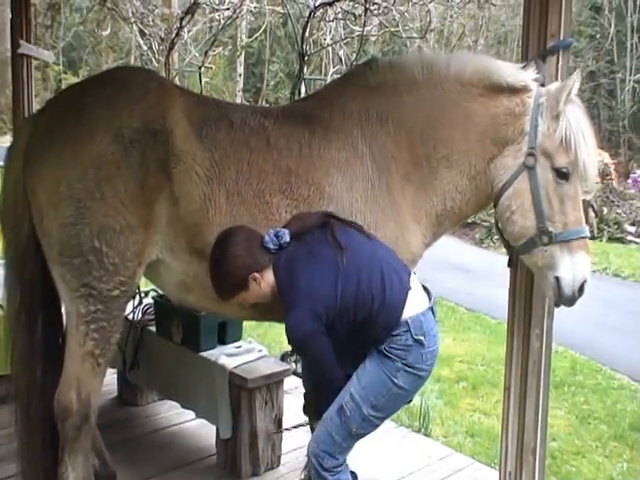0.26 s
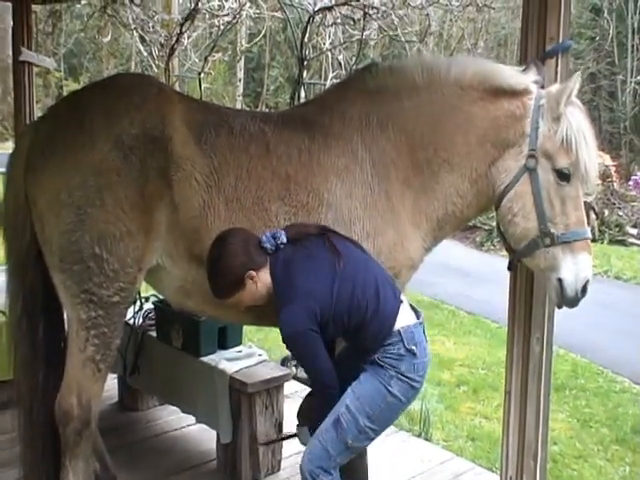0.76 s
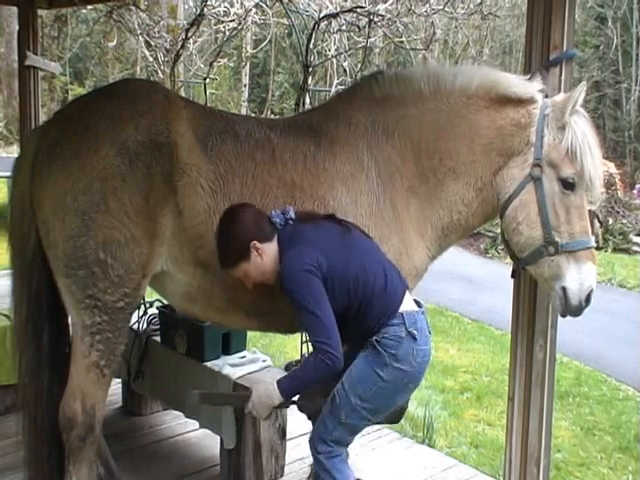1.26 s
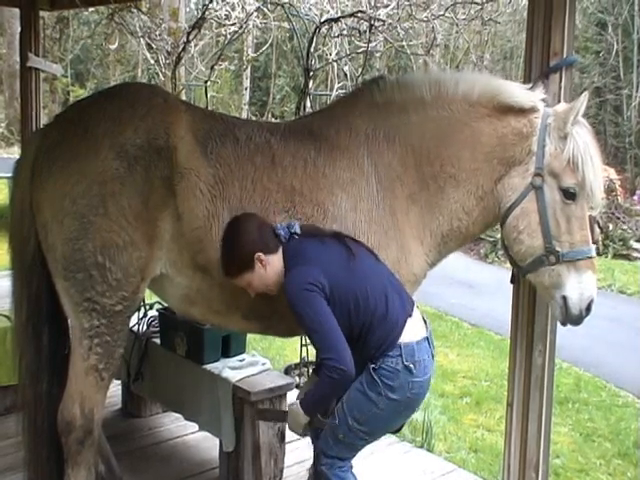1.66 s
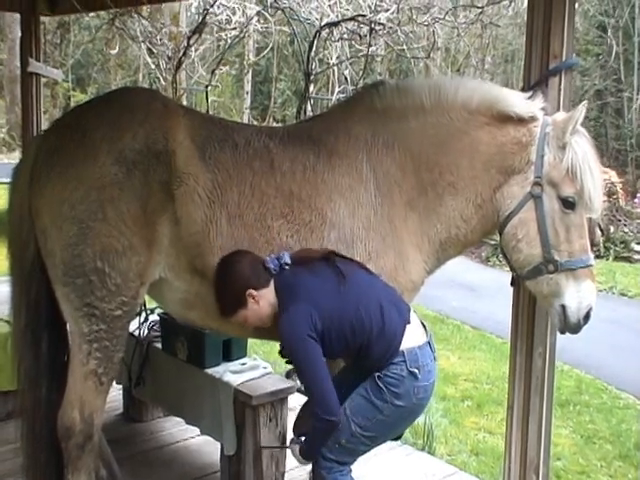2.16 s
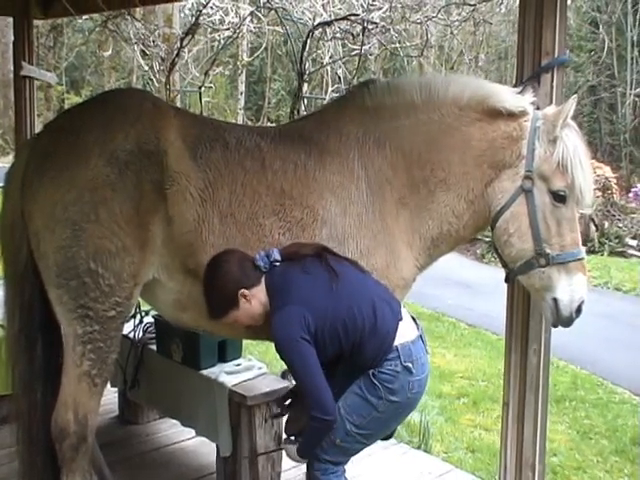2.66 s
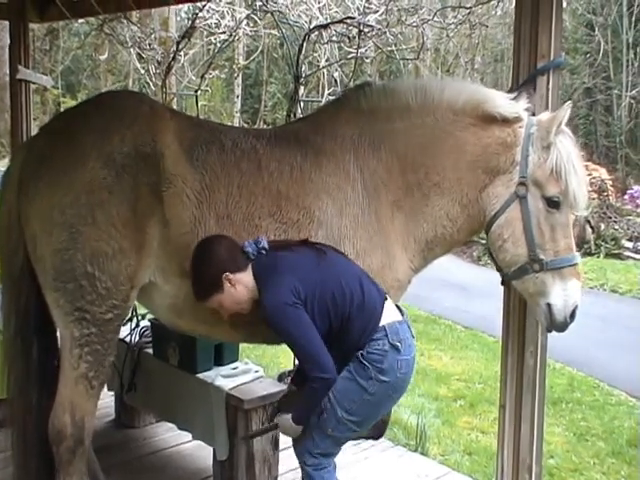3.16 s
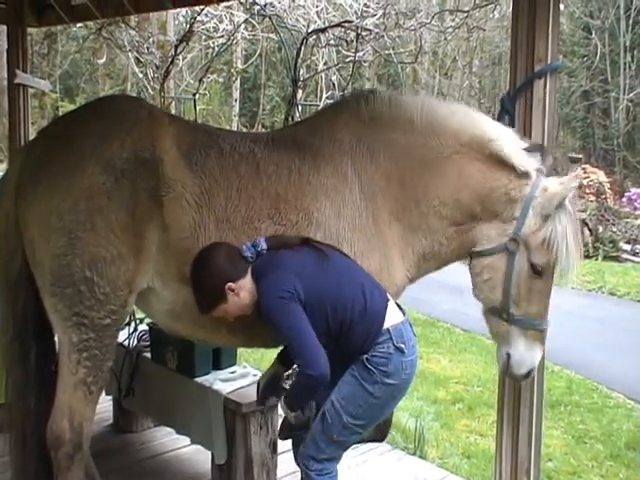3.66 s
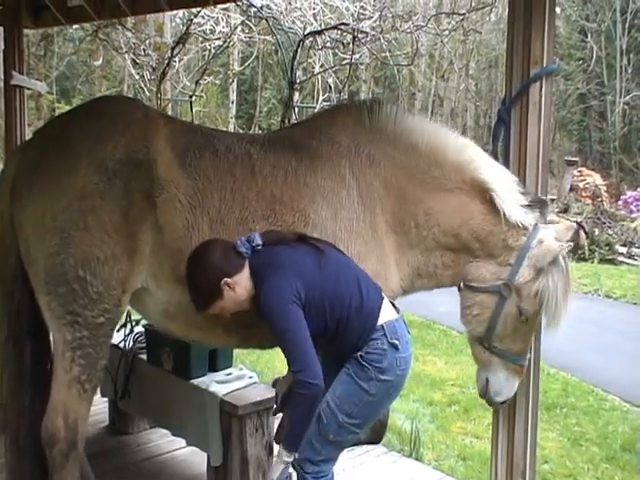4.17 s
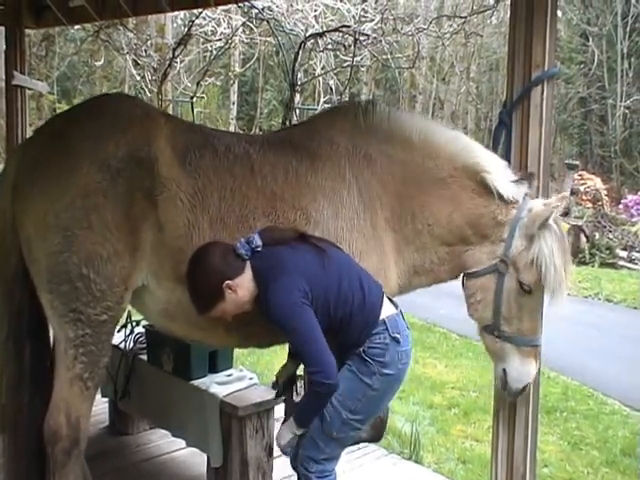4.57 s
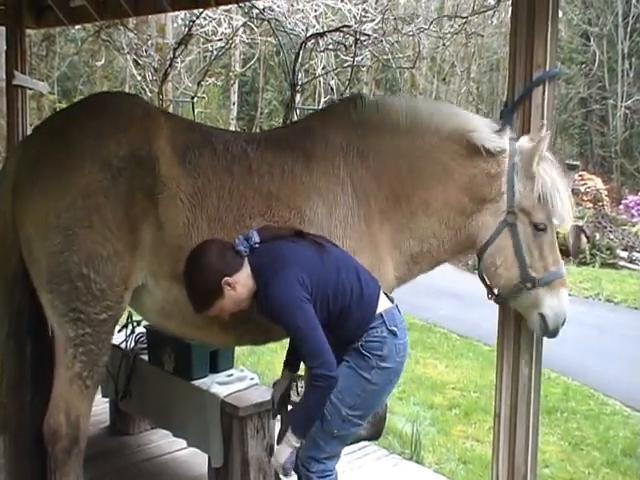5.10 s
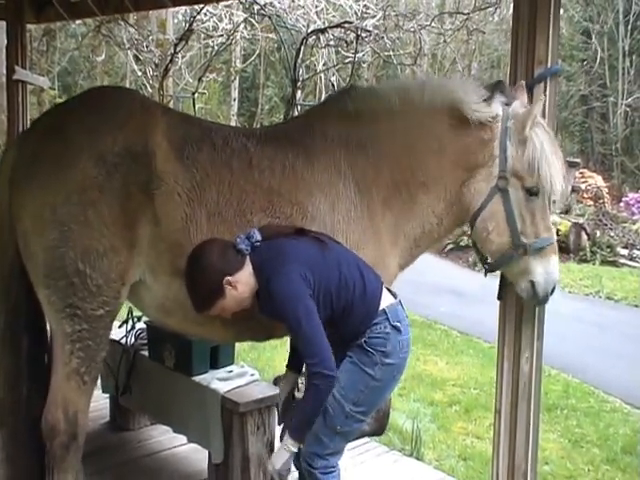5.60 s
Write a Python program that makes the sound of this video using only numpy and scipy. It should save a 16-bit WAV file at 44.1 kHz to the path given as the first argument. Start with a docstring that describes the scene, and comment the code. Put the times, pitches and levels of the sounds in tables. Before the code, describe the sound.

On a covered wooden porch, sharp hoof knocks and gritty drags give way to short metallic rasping strokes on horn, with quiet outdoor air behind.

```python
"""Hoof rasping on a covered porch

A horse shifts its hooves on the boards, then a steel rasp files one hoof in quick strokes.
Hooves knock plank modes awake and drag over grit as clumped clicks; the rasp's teeth tear the horn
in dense clicks that also set the blade ringing. The porch echoes and its deck swings slowly.
Behind lie a wavering motor hum, distant outdoor air as banded noise, hiss and thin whines.
"""
import sys
import numpy as np
from scipy import signal
from scipy.fft import rfft, irfft
from scipy.io import wavfile
from scipy.ndimage import uniform_filter1d

SR = 44100
rng = np.random.default_rng(int(sys.argv[2]) if len(sys.argv) > 2 else 0)


def master_out(mix):
    """Clip the mix to full scale and print it as 16-bit PCM to the path in sys.argv[1]."""
    frames = np.transpose(np.atleast_2d(mix))
    ceiling = np.clip(frames, -1, 1)
    pcm = np.round(ceiling * 32767).astype(np.int16)
    wavfile.write(sys.argv[1], SR, pcm)


def volts_from_db(level):
    """Convert decibel levels to linear amplitude ratios."""
    exponent = np.asarray(level, float) / 20
    return 10 ** exponent


N = 257544

# Blows on the planks: t/s, relative level/dB, boom (weight) re level/dB, snap (hardness) re level/dB
HOOF_KNOCKS = [(.163, -10, -4.5, 1), (.733, -31, 3, -17), (.757, -28, 6, 6), (.921, -21, 3, 10.5),
               (.958, -34.5, 10, -3), (1.139, -54, 18, -8), (1.295, -44, 6, 15), (1.73, -40.5, -5, 25.5),
               (2.411, -22.5, -1.5, 21), (2.676, -52, 14, -6), (2.783, -29, 6, -12), (2.791, -11, 0, 2.5)]
# Close-set plank modes, read as a curve: f/Hz, relative level/dB, typical t60/s
PLANK_MODES = [(91, -19.5, 0.28), (162, -12, 0.51), (220, -12, 0.52), (331, -2.5, 0.28), (490, -12.5, 0.3),
               (623, -1, 0.18), (880, -5, 0.096), (1270, -11, 0.14), (2000, -14, 0.075), (3500, -26, 0.055),
               (5500, -35.5, .04), (8000, -50, 0.033)]
CRACK_SHARE = 0.42  # the middle register takes this share of the snap
KNOCK_LEFT_DB = 6

# Hooves, boots and gloves dragging: start t/s, rise/s, fall/s, relative level/dB, low part (weight)/dB
FOOT_DRAGS = [(.07, 0.018, 0.028, -63.5, 3), (.72, 0.013, 0.033, -50, 2.5), (.79, .1, 0.034, -49, 4.5),
              (1.005, 0.024, .035, -62, -5), (1.12, .022, .02, -67, -3), (1.25, 0.097, 0.052, -55, -0.5),
              (1.68, 0.057, .055, -56.5, -11), (2.035, .03, 0.12, -66, -7),
              (2.28, 0.064, 0.057, -59.5, 3.5), (2.43, 0.0088, .04, -54, 5.5),
              (2.47, 0.045, 0.045, -57.5, 9.5), (2.865, 0.094, .03, -56.5, 3.5),
              (3.127, .012, 0.063, -56.5, -3.5), (3.232, .055, .125, -49.5, -4.5)]
# Colour of the dragged grit: f/Hz, relative level per Hz/dB
GRIT_COLOUR = [(200, 5), (400, -6.5), (800, -0.5), (1300, -5), (2300, -2.5), (3500, -6.5), (5000, -10.5),
               (6500, -20.5), (9000, -32), (14000, -27)]
DRAG_START_DB, DRAG_END_DB = -9.5, -18  # re peak
FINE_GRIT_DB, FINE_GRIT_PER_WEIGHT = -7, -0.39  # a heavy foot crushes less fine grit

# Plank tones rung by a juddering sole: f/Hz, t60/s
JUDDER_TONES = [(800, 0.022), (1800, 0.008)]
JUDDER_START_S, JUDDER_END_S = 0.875, 0.908

# Rasp strokes, long pushes and short light returns:
# start t/s, rise/s, fall/s, relative level/dB, body of the hoof re level/dB
RASP_STROKES = [(4.032, 0.073, 0.076, -43.5, -6), (4.436, .07, .11, -43.5, -7.5),
                (4.724, 0.01, 0.093, -49.5, -1.5), (4.84, 0.071, 0.14, -45, -4),
                (5.225, 0.0068, .05, -52, 2.5), (5.3, .085, 0.093, -43, -7.5),
                (5.636, 0.0091, .035, -56.5, 2.5), (5.7, .09, .12, -45, -8)]
# Rasp set on the hoof: t/s, relative tick level/dB, dull knock level/dB, tick pitch f/Hz
RASP_TAPS = [(3.145, -53, -63, 3500), (3.499, -55, -69, 4500), (3.57, -55, -67, 4500),
             (4.0278, -33, -60, 3900), (4.28, -50.5, -73, 6950), (4.416, -52, -45, 2000),
             (4.726, -52, -58, 5000), (4.836, -41, -47, 7340), (4.861, -43, -50, 2480),
             (5.226, -51, -48, 4000), (5.640, -51.5, -43, 4500)]
# Pitches of the blade's modes: f/Hz
BLADE_PITCHES = [1290, 1612, 2300, 2510, 3006, 3866, 4700, 4770, 5524, 5741, 6660, 6910, 7850, 8170, 9480,
                 11500]
# The same modes in order: width/Hz, relative level/dB
BLADE_MODES = [(55, -5), (30, -4), (60, -4), (100, -1.5), (40, -4), (45, -4), (60, -6), (40, -6.5),
               (35, -11), (45.4, -3), (50.926, -7.5), (50, -11.5), (58, -6.5), (56, -18), (240, -16),
               (80, -12.5)]
# Colour of torn horn: f/Hz, relative level per Hz/dB
HORN_COLOUR = [(120, -36), (200, -2), (479, -6.5), (618, 1.5), (1840, -0.5), (2960, 6.5), (3550, -4),
               (4660, 3), (5010, 3), (5700, 5.5), (6240, 7), (15500, -13)]
STROKE_START_DB, STROKE_END_DB = -11, -24  # re peak
BODY_FOLLOWS = 0.64  # share of the pressure swing, in dB, that the hoof body follows
# The top edge brightens with pressure: level at a full push, dB per dB of stroke, stroke level of a full push
EDGE_DB, EDGE_SHARPENS, EDGE_FULL_DB = -4.5, 0.35, -45

# Weight landing on the deck: t/s, relative level/dB
DECK_SHUDDERS = [(0.949, -47.5), (2.799, -42.5), (4.15, -67), (4.929, -57)]
DECK_LOWER_HZ, DECK_UPPER_HZ = 44, 76
DECK_T60_S, DECK_UPPER_DB = 0.34, 3.5  # decay of each resonance at the lower pitch; upper tone's extra push

# Echo decay under the porch roof: f/Hz, t60/s
PORCH_DECAY = [(100, 0.46), (400, 0.21), (1000, 0.35), (3000, 0.29), (10000, 0.35)]
BAND_EDGES_HZ = 25 * 2 ** np.arange(0, 9.4, .4)

# The lower hum tone fades and returns: t/s, level/dB
LOWER_HUM_FADES = [(0, -59), (1.33, -64), (2.3, -57), (3.3, -62.5), (3.67, -80), (4.28, -71), (4.85, -60),
                   (5.84, -63)]
# Thin treble whines: f/Hz, level before panning/dB
THIN_WHINES = [(3000, -83.5), (5970, -87.5), (8920, -93)]
HUM_UPPER_HZ, HUM_LOWER_HZ, HUM_UPPER_DB = 119.3, 77.5, -57.5
TOP_WHINE_HZ, TOP_WHINE_DB, TOP_WHINE_ON_S = 15699, -77, 1.19

# Colour of air and hiss: f/Hz, relative level per Hz/dB
AIR_COLOUR = [(25, -12), (50, -11.5), (92, -7), (150, -11.5), (250, -17.5), (700, -20.5), (1000, -21.5),
              (2500, -31.5), (5000, -37.5), (8000, -39), (11000, -42.5), (11600, -35.5), (13300, -40),
              (14500, -41), (15600, -30)]
# How alike the air is left and right: f/Hz, likeness (1 = identical)
AIR_LIKENESS = [(60, 0.23), (250, 0.9), (1000, 0.52), (4000, 0.28), (12000, 0.72)]
# Lean of the air to the left: f/Hz, left re right level/dB
AIR_LEAN = [(60, 1), (240, 0.5), (950, 6), (3770, 8), (15000, 2)]
# Swell of the air, the hiss above staying more even: f/Hz, depth of each of two drifts/dB
AIR_SWELL = [(2000, 1.2), (5000, .4)]
AIR_DB = -56.4


def rms_one(x):
    """Scale to unit power."""
    return x / np.sqrt(np.mean(x ** 2) + 1e-20)


def in_time(rows):
    """Draw a curve's columns sample by sample."""
    s, *columns = np.transpose(rows)
    return [np.interp(np.arange(N) / SR, s, c) for c in columns]


def in_spells(rows, start_db, end_db, fade_s):
    """Each gesture arches up to its peak and down again: its gain, its dB below the peak, its own colour."""
    t = np.arange(N) / SR
    gain, below_db, colour_db = np.zeros((3, N))
    for start_s, rise_s, fall_s, peak_db, own_db in rows:
        since = t - start_s - rise_s
        arch_db = np.where(since < 0, start_db * (since / rise_s) ** 2, end_db * (since / fall_s) ** 2)
        level = volts_from_db(peak_db + arch_db) * (since > -rise_s) * (since < fall_s)
        on_top = level > gain
        gain[on_top] = level[on_top]
        below_db[on_top] = arch_db[on_top]
        colour_db[t > start_s - fade_s] = own_db
    return uniform_filter1d(gain, size=int(fade_s * SR)), below_db, colour_db


def at_hz(points, hz):
    """Read a spectrum on a log frequency axis."""
    points = np.array(points)
    return np.interp(np.log(hz), np.log(points[:, 0]), points[:, 1])


def drift(rate_hz):
    """Slow random wander of spread 1: low-passed noise, drawn at every 40th sample."""
    r = np.exp(-80 * np.pi * rate_hz / SR)
    noise = rng.standard_normal(N // 40 + 2002)
    slow = signal.lfilter([1], [1, -2 * r, r * r], noise)[2000:]  # skip the filter's start
    return np.interp(np.arange(N) / 40, np.arange(len(slow)), rms_one(slow))


def ring(clicks, hz, t60):
    """A two-pole resonator: a unit click sets a dying sine of about height 1 ringing."""
    r, w = volts_from_db(-60 / (t60 * SR)), 2 * np.pi * hz / SR
    return signal.lfilter([0, np.sin(w)], [1, -2 * r * np.cos(w), r * r], clicks + 1e-18)


def band(x, low_hz, high_hz):
    """Band-pass."""
    return signal.sosfilt(signal.butter(2, [low_hz, high_hz], "band", fs=SR, output="sos"), x)


def coloured(x, spectrum):
    """Give a white signal a spectrum."""
    hz = np.fft.rfftfreq(N, 1 / SR) + 1
    return irfft(rfft(x) * volts_from_db(at_hz(spectrum, hz)), N)


def grains(per_s, spread_db):
    """Random clicks of uneven size, coming in clumps as their density drifts."""
    sizes = volts_from_db(spread_db * np.minimum(rng.exponential(1, N), 5)) * rng.choice([-1, 1], N)
    struck = rng.random(N) < per_s * volts_from_db(3.0 * drift(40)) / SR
    return rms_one(sizes * struck)


def panned(x, left_db):
    """Place a sound between the channels."""
    return np.array([x * volts_from_db(left_db / 2), x * volts_from_db(-left_db / 2)])


def knocks():
    """Every blow wakes its own dense set of plank modes; a hard rap dies within a few cycles, the boom lingers."""
    out, t = np.zeros((2, N)), np.arange(SR // 4) / SR
    planks, grid = np.array(PLANK_MODES), np.geomspace(90, 8000, 80)[:, None]
    chances = rng.random((len(HOOF_KNOCKS), 4, 80, 1))
    for (s, peak_db, boom_db, snap_db), chance in zip(HOOF_KNOCKS, chances):
        hz = grid * (1 + 0.0498 * chance[0])
        t60 = at_hz(planks[:, ::2], hz) * (0.81 + 0.48 * chance[1])
        tilt_db = np.interp(np.log(hz), np.log([250, 700, 1800, 4500]),
                            [boom_db, 0, CRACK_SHARE * snap_db, snap_db])
        heights = volts_from_db(at_hz(planks, hz) + tilt_db + 4.0 * chance[2])
        waves = heights * np.sin(2 * np.pi * (hz * t + chance[3]))
        swell = 1 - np.exp(-t * hz * 0.83)  # low modes take longer to build
        rattle_db = 2.5 * np.clip(hz / 1000, 0, 1) * drift(30)[:len(t)]  # loose boards chatter in the tail
        rap = volts_from_db(-60 * t / (0.0055 + 17.2 / hz))
        tail = volts_from_db(-11 + rattle_db) * volts_from_db(-60 * t / t60)
        blow = volts_from_db(peak_db - 12) * waves * swell * (tail + rap)
        left_db = KNOCK_LEFT_DB * np.clip(hz / 900, 0, 1)  # the bass stays near the middle
        at = round(s * SR)
        out[:, at:at + len(t)] += panned(blow, left_db).sum(axis=1)
    return out


def drags():
    """Grit catching under a sliding foot: clumped clicks, the low part carried by the wood."""
    gain, _, low_db = in_spells(FOOT_DRAGS, DRAG_START_DB, DRAG_END_DB, fade_s=0.015)
    grit = coloured(grains(3000, spread_db=1.5), GRIT_COLOUR)
    scrape = rms_one(band(grit, 1130, 4900))
    wood = volts_from_db(low_db) * rms_one(band(grit, 275, 1690))
    fine = volts_from_db(FINE_GRIT_DB + FINE_GRIT_PER_WEIGHT * low_db) * rms_one(band(grit, 5330, 10900))
    return panned(gain * (scrape + wood + fine), 5.5)


def judder():
    """A sole judders on the wood: uneven stick-slip pulses, strongest at first, ring two plank tones."""
    at = JUDDER_START_S + np.cumsum(rng.uniform(0.002, 0.004, 40))  # gaps in s
    slips = np.zeros(N)
    slips[(at * SR).astype(int)] = volts_from_db(-31 - 290 * (at - JUDDER_START_S)) * (at < JUDDER_END_S)
    return panned(sum(ring(slips, hz, t60) for hz, t60 in JUDDER_TONES), 4)


def rasp():
    """Teeth tear the horn in dense clicks; the same jolts, and each tap, ring the modes of the blade."""
    gain, below_db, body_db = in_spells(RASP_STROKES, STROKE_START_DB, STROKE_END_DB, fade_s=0.0031)
    teeth = grains(4000, spread_db=2.0)
    torn = coloured(teeth, HORN_COLOUR)
    tear = rms_one(band(torn, 1050, 5500))
    body = volts_from_db(body_db - (1 - BODY_FOLLOWS) * below_db) * rms_one(band(torn, 210, 1060))
    sharpness = (gain / volts_from_db(EDGE_FULL_DB)) ** EDGE_SHARPENS
    edge = volts_from_db(EDGE_DB) * sharpness * rms_one(band(torn, 6200, 14500))

    taps, thuds = np.zeros((2, N))
    s, tap_db, thud_db, _ = np.transpose(RASP_TAPS)
    at = (s * SR).astype(int)
    taps[at], thuds[at] = volts_from_db(tap_db), volts_from_db(thud_db)
    jolts = volts_from_db(-33.0) * gain * teeth + volts_from_db(-19.5) * taps
    blade = np.zeros(N)
    for hz, (width_hz, db) in zip(BLADE_PITCHES, BLADE_MODES):
        # the grip and the point of contact shift, so each mode comes and goes
        gripped = jolts * volts_from_db(3.5 * drift(6.6))
        blade += volts_from_db(db) * np.sqrt(width_hz / 50) * ring(gripped, hz, 2.3 / width_hz)
    hoof = ring(thuds, 530, 0.02) + ring(thuds, 690, 0.013)
    return panned(volts_from_db(-1.5) * gain * (tear + body + edge) + blade + volts_from_db(5) * ticks() + hoof, 5.7)


def ticks():
    """Steel meets horn: a noise burst of a few milliseconds around its own pitch."""
    out, t = np.zeros(N), np.arange(SR // 50) / SR
    noises = rng.standard_normal((len(RASP_TAPS), len(t)))
    for (s, tap_db, _, hz), noise in zip(RASP_TAPS, noises):
        at = int(s * SR)
        burst = band(noise * volts_from_db(-60 * t / 0.018), hz / 1.9, hz * 1.3)
        out[at:at + len(t)] += volts_from_db(tap_db) * band(burst, hz / 1.6, min(hz * 3.0, 18000))
    return out


def deck():
    """The joists swing slowly: resonators in pairs make two deep tones that swell and die."""
    pushes = np.zeros(N)
    for s, db in DECK_SHUDDERS:
        pushes[round(s * SR)] = volts_from_db(db)

    def swing(hz):
        """One deep tone; the higher it lies, the sooner it dies."""
        t60 = DECK_T60_S * DECK_LOWER_HZ / hz
        return ring(ring(pushes, hz, t60), hz, t60)
    return panned(0.0047 * (swing(DECK_LOWER_HZ) + volts_from_db(DECK_UPPER_DB) * swing(DECK_UPPER_HZ)), 3.1)


def porch(x):
    """Roof, wall and planks answer with dense echoes that die band by band, other ones in each channel."""
    t = np.arange(SR // 2) / SR
    white = rng.standard_normal((2, len(t))) * (t > .003)
    echo = np.zeros((2, len(t)))
    for low, high in zip(BAND_EDGES_HZ[::2], BAND_EDGES_HZ[2::2]):
        t60 = at_hz(PORCH_DECAY, np.sqrt(low * high))
        echo += band(white, low, high) * volts_from_db(-60 * t / t60)
    return signal.fftconvolve([x.mean(axis=0)], echo, axes=1)[:, :N]


def tone(hz, waver_hz, flutter_db):
    """A sine of rms about 1 that wanders in pitch and level."""
    phase = 2 * np.pi * np.cumsum(hz + waver_hz * drift(5.97)) / SR
    return np.sqrt(2) * volts_from_db(flutter_db * drift(23)) * np.sin(phase)


def hum():
    """A far motor drones on two low tones; thin whines sit in the treble, the topmost setting in later."""
    upper = volts_from_db(HUM_UPPER_DB) * tone(HUM_UPPER_HZ, 1.2, 1.5)
    lower = volts_from_db(in_time(LOWER_HUM_FADES)[0]) * tone(HUM_LOWER_HZ, 2.5, 2.5)
    thin = sum(volts_from_db(db) * tone(hz, 12, 2.5) for hz, db in THIN_WHINES)
    switched_on = np.arange(N) > TOP_WHINE_ON_S * SR
    top = volts_from_db(TOP_WHINE_DB) * switched_on * tone(TOP_WHINE_HZ, 1.5, 1.3)
    return upper + lower + panned(thin + top, 3)


def air():
    """Far traffic, leaves and microphone hiss: bands of noise that swell a little together."""
    out, together = np.zeros((2, N)), drift(1.0)
    white = coloured(rng.standard_normal((2, 2, N)), AIR_COLOUR)
    for k, (low, high) in enumerate(zip(BAND_EDGES_HZ, BAND_EDGES_HZ[1:])):
        mid, side = band(white[k % 2], low, high)  # neighbouring bands draw on different noise
        hz = np.sqrt(low * high)
        alike = np.clip(at_hz(AIR_LIKENESS, hz), -1, 1)
        swell = volts_from_db(at_hz(AIR_SWELL, hz) * (together + drift(3.8)))
        stereo = np.sqrt(1 + alike) * mid + np.sqrt(1 - alike) * side * [[1], [-1]]
        out += panned(swell, at_hz(AIR_LEAN, hz)) * stereo
    return volts_from_db(AIR_DB) * out / np.sqrt(np.mean(band(out, 163, 15800) ** 2))


def scene():
    """Everything near the horse excites the porch; deck, air and hum join without echo."""
    near = knocks() + drags() + judder() + rasp()
    return near + volts_from_db(-36) * porch(near) + deck() + air() + hum()


def roll_off(x):
    """The treble ends steeply here."""
    return signal.sosfilt(signal.butter(12, 16460, fs=SR, output="sos"), x)


def record(dry):
    """A steep elliptic low-pass cuts off the very top."""
    steep = signal.ellip(10, .5, 60, 15770, fs=SR, output="sos")
    mix = signal.sosfilt(steep, dry)
    return roll_off(mix)


dry = scene()
out = record(dry)
master_out(out)
```